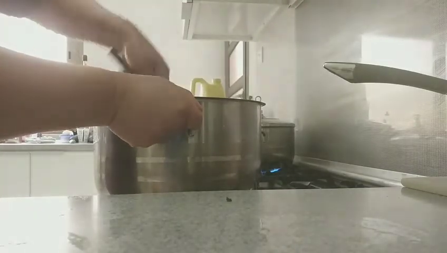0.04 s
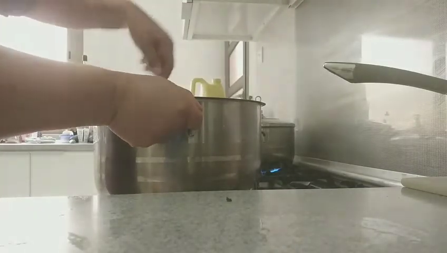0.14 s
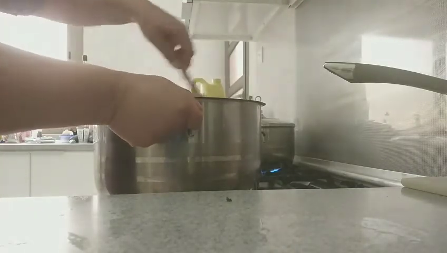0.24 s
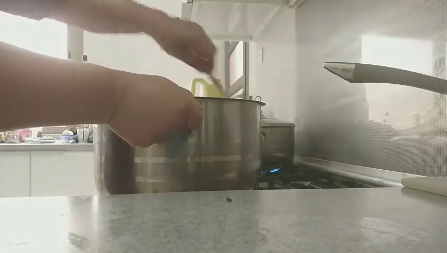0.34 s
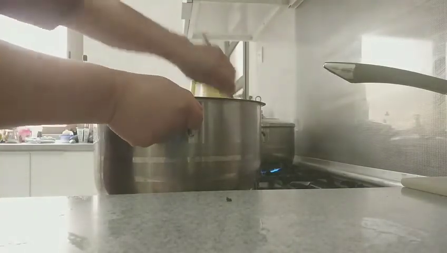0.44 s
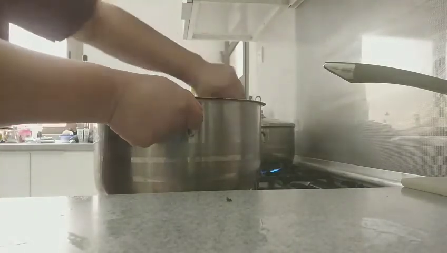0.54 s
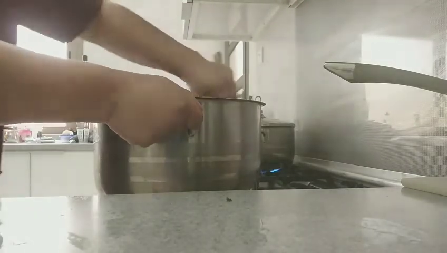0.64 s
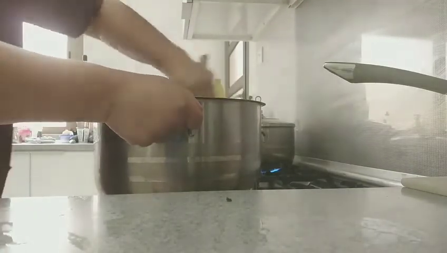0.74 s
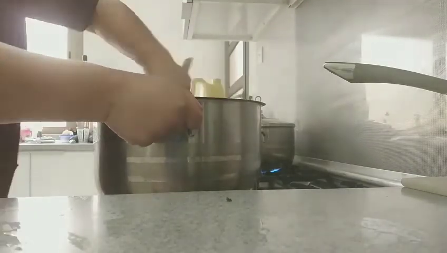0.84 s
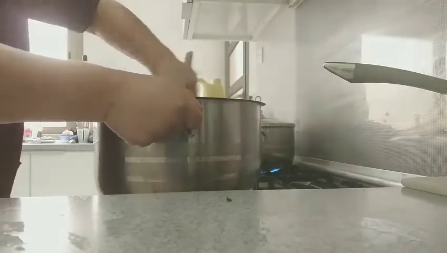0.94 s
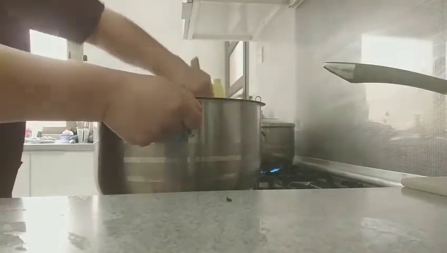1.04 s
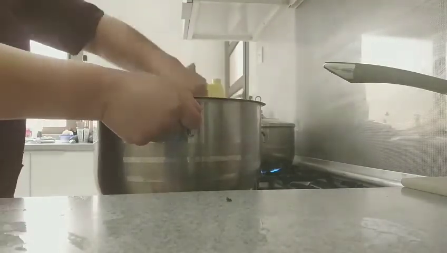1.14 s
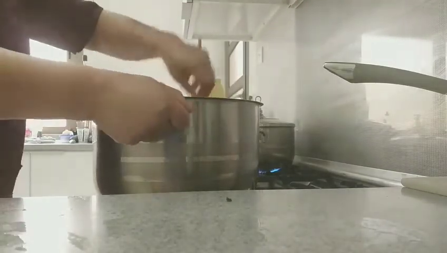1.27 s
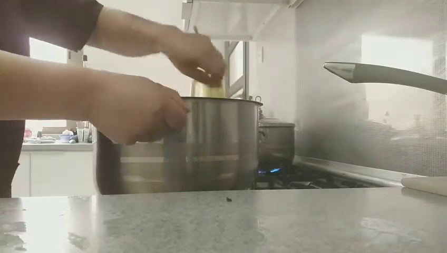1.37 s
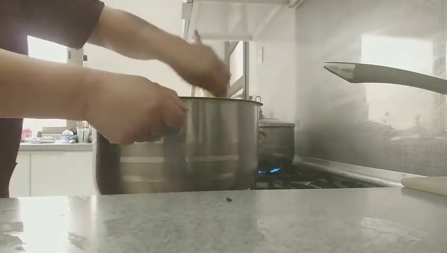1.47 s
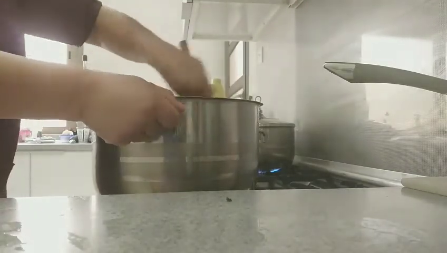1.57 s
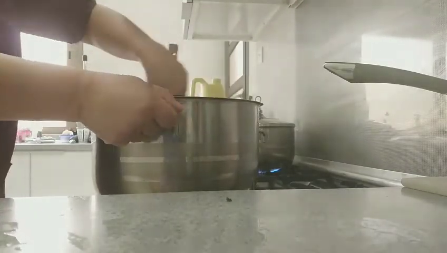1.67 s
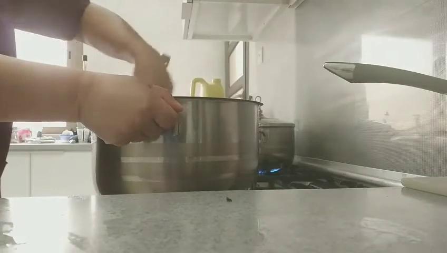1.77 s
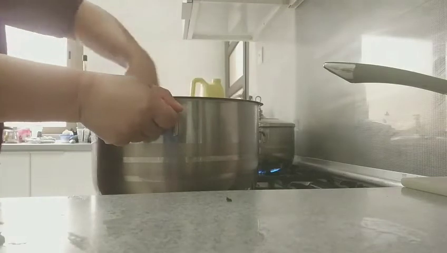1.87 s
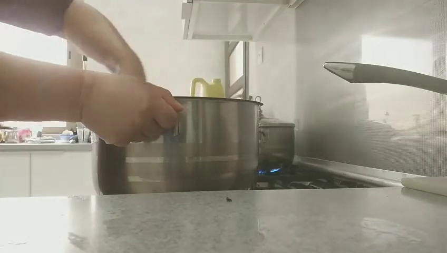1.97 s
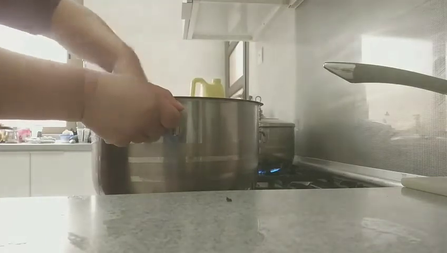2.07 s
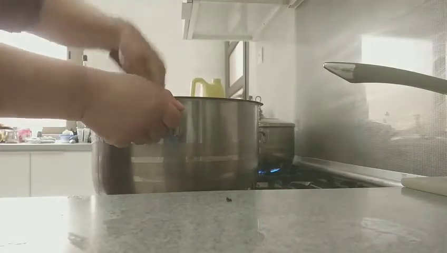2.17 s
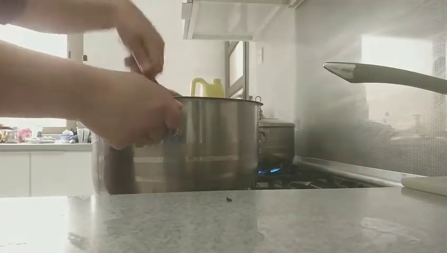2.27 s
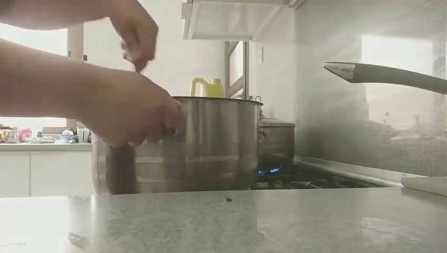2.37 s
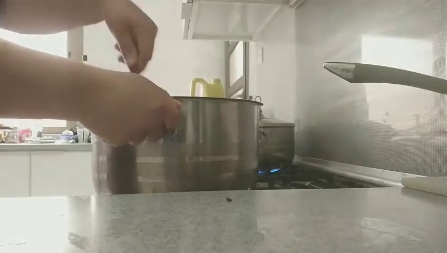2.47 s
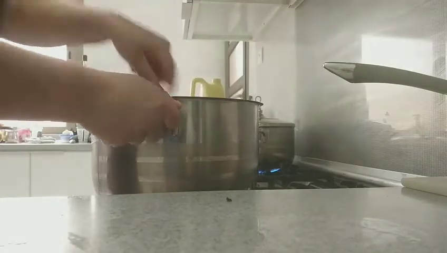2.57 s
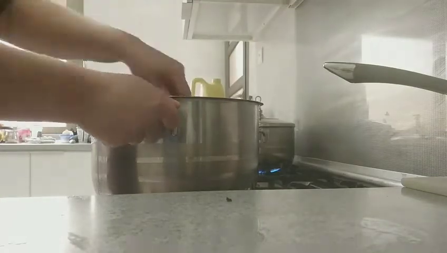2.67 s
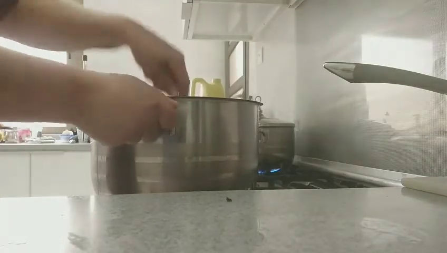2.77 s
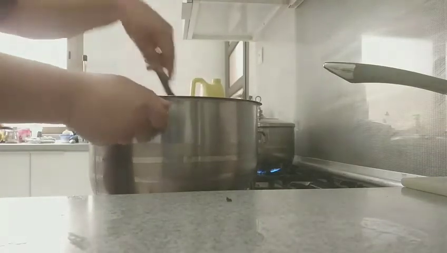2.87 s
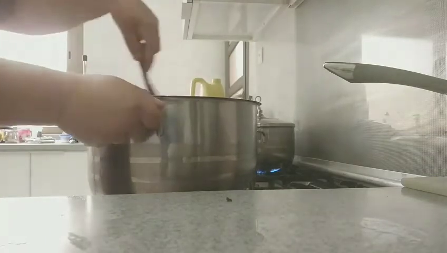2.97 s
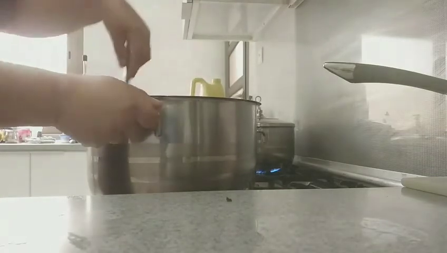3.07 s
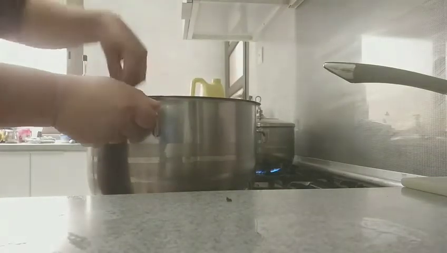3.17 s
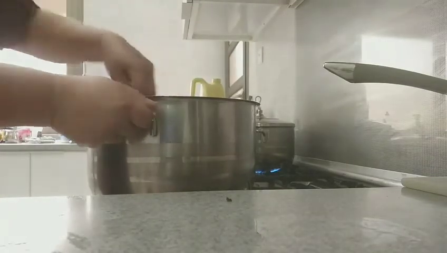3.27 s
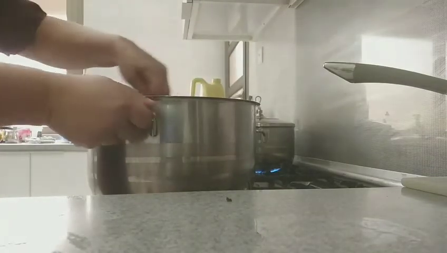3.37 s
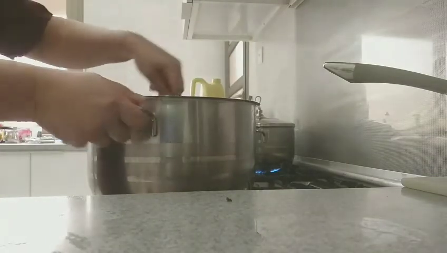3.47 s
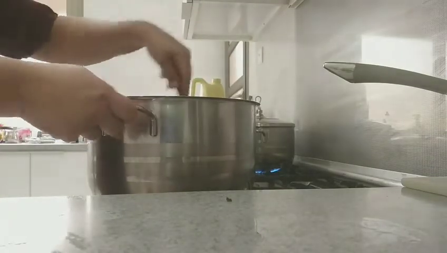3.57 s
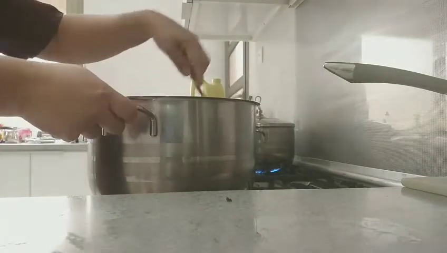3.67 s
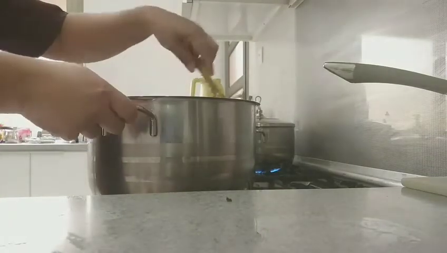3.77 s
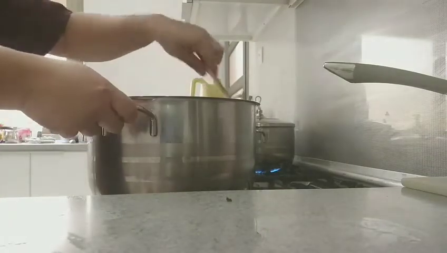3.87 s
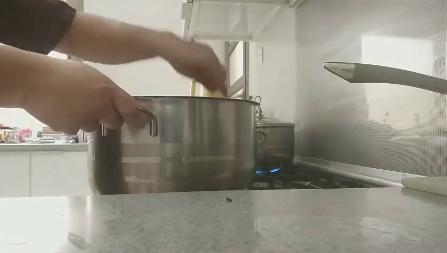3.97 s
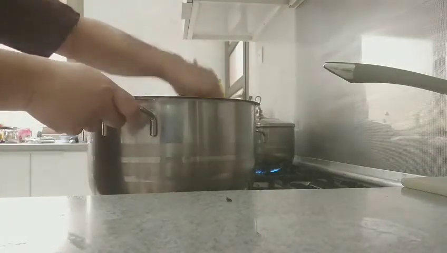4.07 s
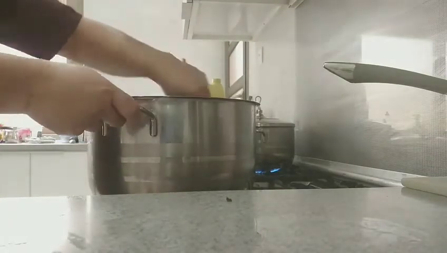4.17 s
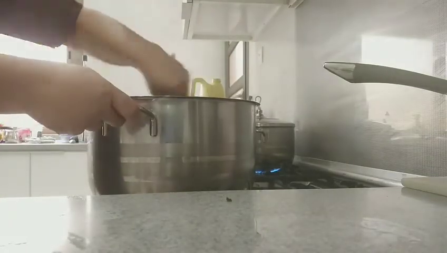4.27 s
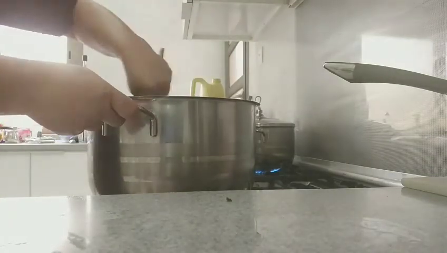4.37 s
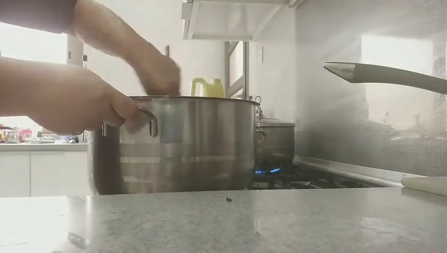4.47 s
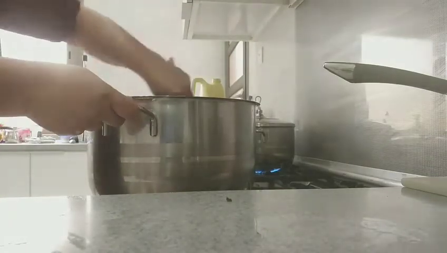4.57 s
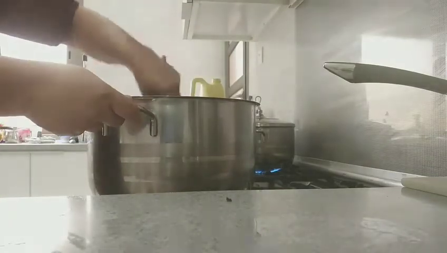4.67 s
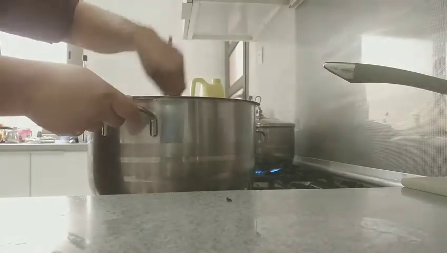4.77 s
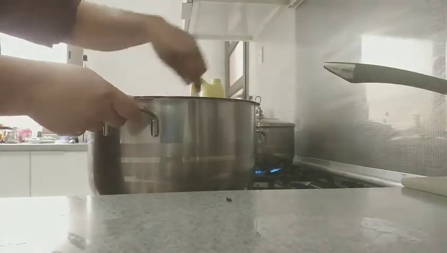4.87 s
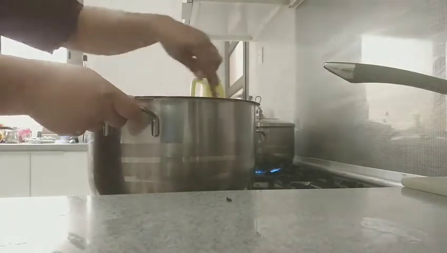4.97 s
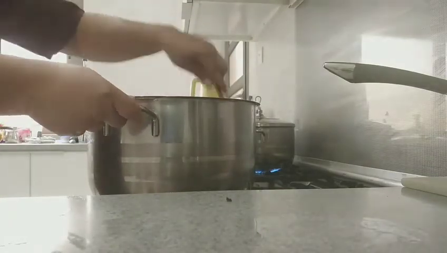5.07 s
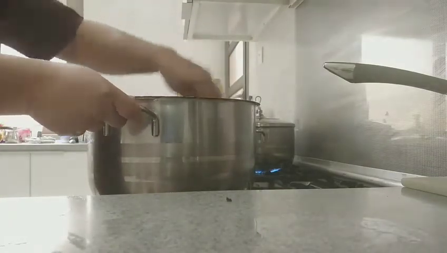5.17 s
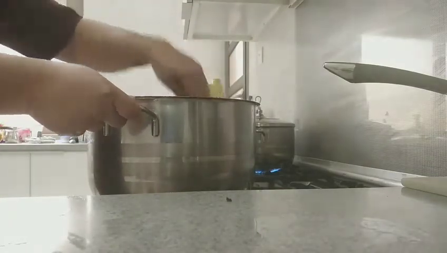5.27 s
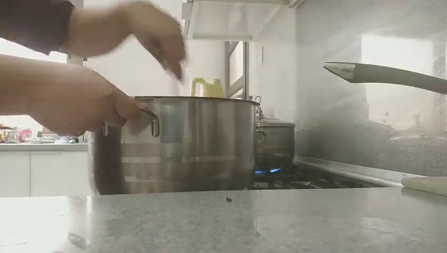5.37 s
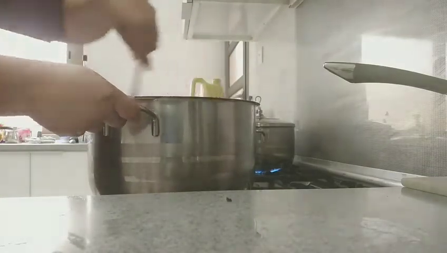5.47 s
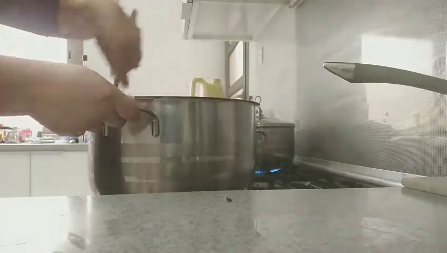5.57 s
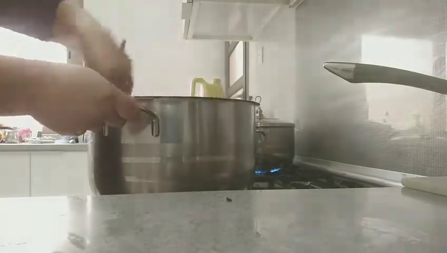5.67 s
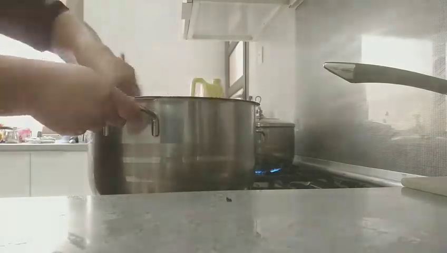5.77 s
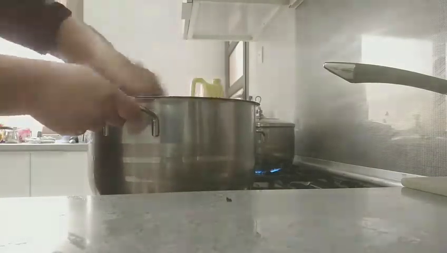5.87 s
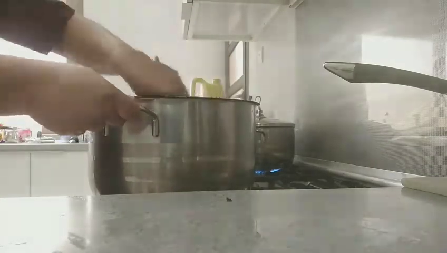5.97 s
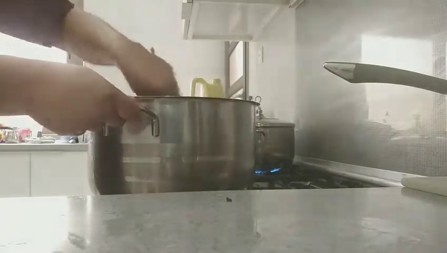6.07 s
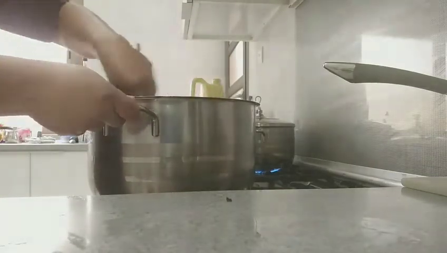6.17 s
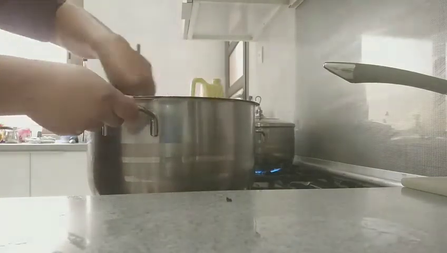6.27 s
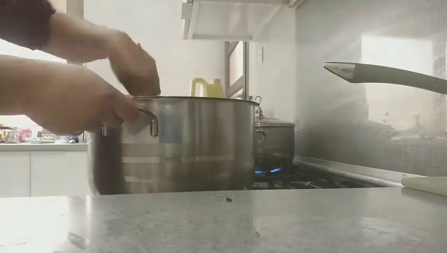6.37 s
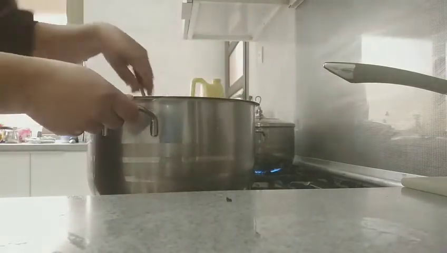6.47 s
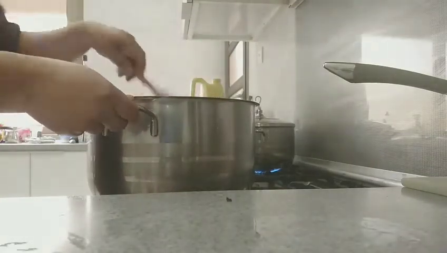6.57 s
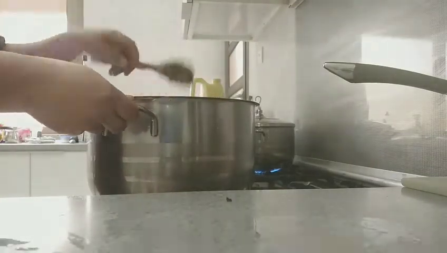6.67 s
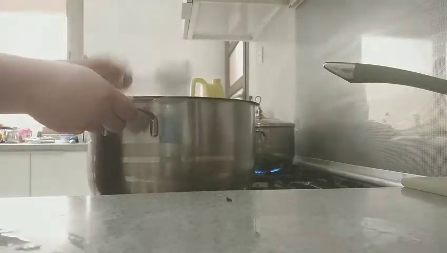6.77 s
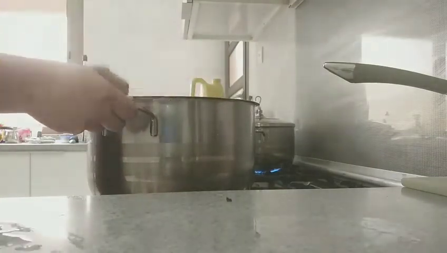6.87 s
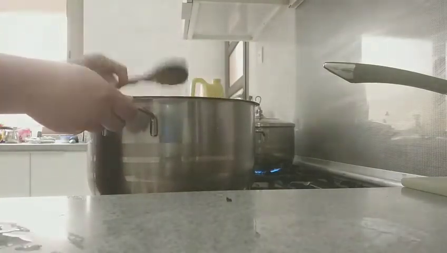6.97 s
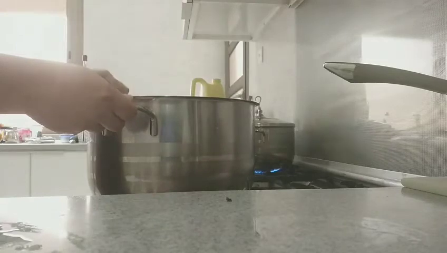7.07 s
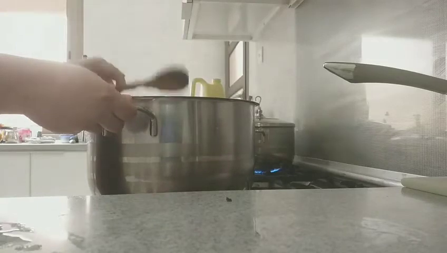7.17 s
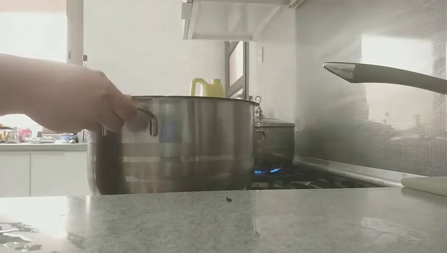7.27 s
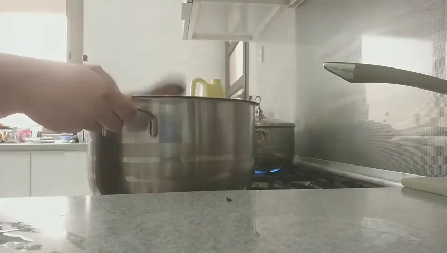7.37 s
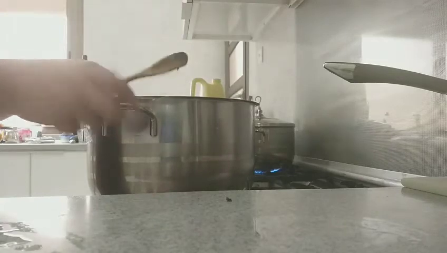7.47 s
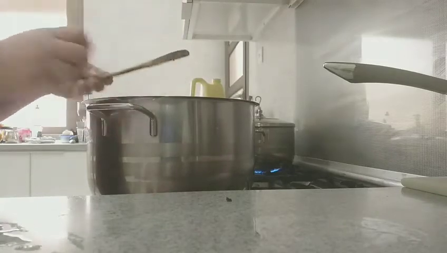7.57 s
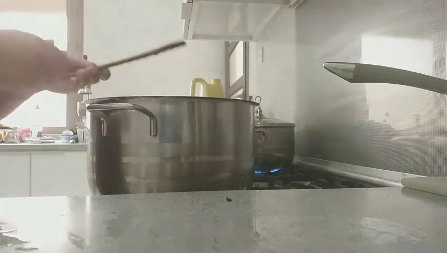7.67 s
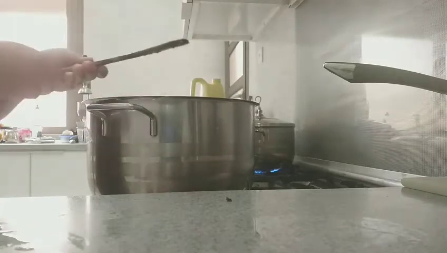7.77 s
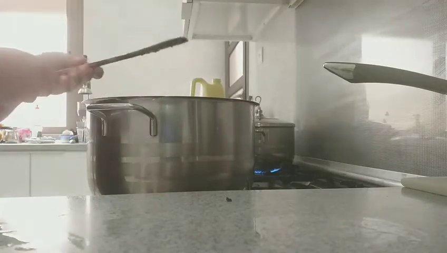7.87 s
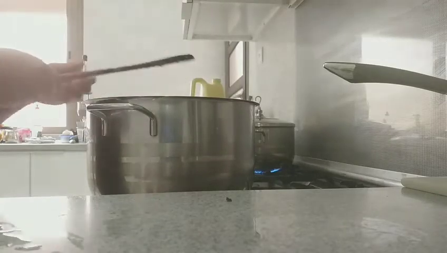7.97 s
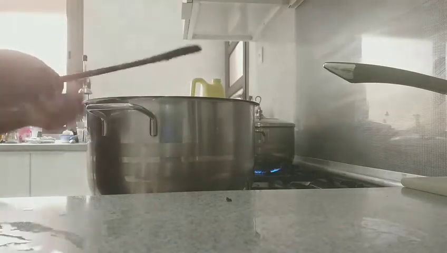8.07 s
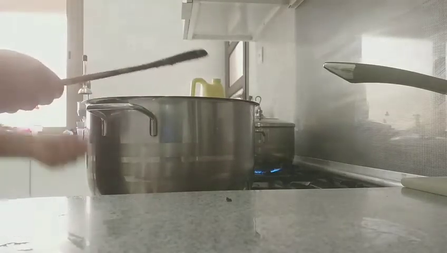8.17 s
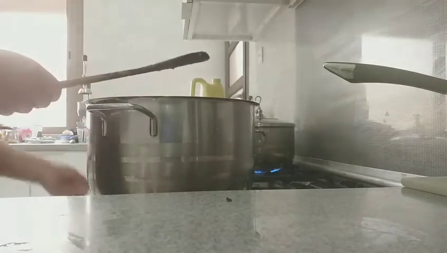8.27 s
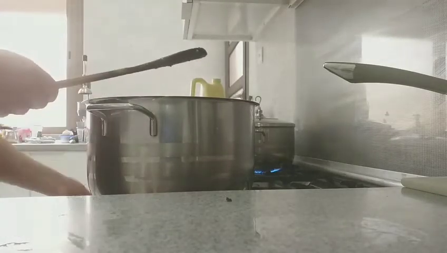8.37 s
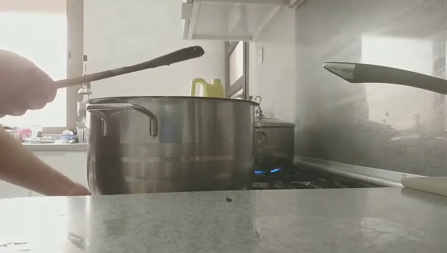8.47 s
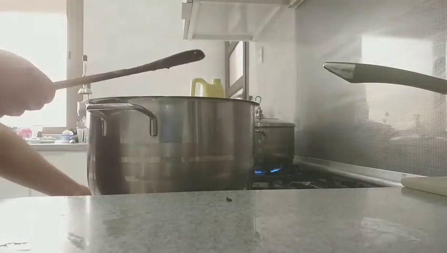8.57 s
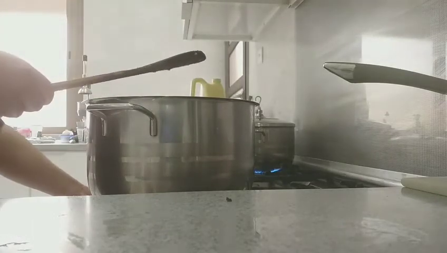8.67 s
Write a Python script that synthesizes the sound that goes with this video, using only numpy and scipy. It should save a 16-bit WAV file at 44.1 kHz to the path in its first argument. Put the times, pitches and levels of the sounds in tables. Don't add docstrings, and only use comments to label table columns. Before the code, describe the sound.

Stirring in a large steel pot: gritty scrapes, sizzling spits and scattered clanks, ending in three bright, ringing raps on the rim.

```python
import sys
import numpy as np
from scipy import signal
from scipy.fft import rfft, irfft
from scipy.io import wavfile
from scipy.ndimage import uniform_filter1d

SR = 44100
rng = np.random.default_rng(int(sys.argv[2]) if len(sys.argv) > 2 else 0)


def level_to_linear(level):
    exponent = np.asarray(level, float) / 20
    return 10 ** exponent


def pcm_store(signal):
    levels = np.round(np.clip(np.atleast_2d(signal), -1, 1) * 32767)
    wavfile.write(sys.argv[1], SR, levels.astype(np.int16).T)


N = 384552


def level(x, db):
    return x * level_to_linear(db) / np.sqrt(np.mean(x ** 2))


def band(x, lo_hz, hi_hz, order=3):
    return signal.sosfilt(signal.butter(order, [lo_hz, hi_hz], "band", fs=SR, output="sos"), x)


def walk(rate_hz):
    hold = int(SR / rate_hz)
    held = np.repeat(rng.standard_normal(N // hold + 1), hold)
    return 1.8 * uniform_filter1d(uniform_filter1d(held, hold), hold)[:N]


def fade(t, t60_s):
    return np.exp(-np.log(1000) * t / np.maximum(t60_s, 1 / 200))


def ring(modes, t, scatter_db, wobble):
    hz, db, t60_s = np.transpose(modes)[:, :, None]
    chance = rng.standard_normal((len(modes), 1))
    steps = rng.standard_normal((len(modes), len(t) // 64 + 1))
    path = np.repeat(np.cumsum(steps, axis=1), 64, axis=1)[:, :len(t)]
    drift = wobble * np.sqrt(hz / 1000) * path
    tones = np.sin(2 * np.pi * hz * t + drift)
    return np.sum(level_to_linear(db + scatter_db * chance) * fade(t, t60_s) * tones, axis=0)


# (peak t/s, level/dB, grit/dB, rise s per 10 dB, fall s per 10 dB)
SCRAPES = [(0.019, -59, 8, 0.2, 0.2), (0.301, -60.5, 0.5, 0.19, 0.073), (.7, -54, 4, 0.087, 0.11),
           (.93, -55, -4, 0.071, 0.17), (1.09, -51.5, -9, 0.14, 0.2), (1.41, -45, 4.7, 0.029, 0.15),
           (1.49, -43.5, 0.7, 0.13, 0.11), (1.72, -47, -4.5, 0.15, 0.18), (2.05, -57.5, 5.7, 0.42, 0.19),
           (2.78, -57.5, 7.5, 0.19, 0.087), (3.05, -46, 3, 0.081, 0.17), (3.42, -48.5, 3, .11, 0.11),
           (3.88, -60.5, 1, 0.046, 0.21), (4.22, -52.5, 7, 0.12, 0.14), (4.51, -52, -20, 0.12, 0.25),
           (4.7, -54, -7, 0.19, 0.23), (5.05, -67, 3, 0.17, 0.075), (5.4, -59, 1.5, 0.081, 0.17),
           (5.82, -53.5, 2, 0.052, 0.11), (6.03, -55, 4.3, .1, 0.34), (6.34, -52, -3.5, 0.15, 0.22),
           (6.49, -57, -9, 0.11, .15)]
# thrum, rub, rasp, sizzle [level/dB]
SCRAPE_COLOUR_DB = [-4.5, 0.5, -4.5, -8]
GRIT_SHARE = [0.41, 0, 0.81, .6]
# (peak t/s, level/dB, rise s per 10 dB)
SPITS = [(.05, -57, 3.5), (0.681, -61.5, 0.75), (1.01, -57.5, 0.1), (1.16, -57, 0.2), (1.45, -54.5, 0.25),
         (1.66, -52, -1.9), (1.78, -55, -1.5), (2.33, -54.5, 0.5), (2.63, -53, 0.08), (2.82, -56, -0.2),
         (3.06, -66, 0.6), (3.42, -58, -0.6), (3.61, -55.5, .04), (3.79, -53.5, 0.04), (4.23, -51, 0),
         (4.56, -53, 0.23), (4.75, -59, .1), (5.35, -61, 0.34), (5.87, -54, -0.13), (6.03, -58.5, 0.17),
         (6.4, -61, -0.2), (6.5, -65, -0.4)]
SPIT_COLOUR_DB = [-33, -8, -4, 0.5]
SIMMER_DB = [-70.5, -72.5, -68, -67.5]


def swell(t, peak_s, db, rise_s, fall_s):
    climb = (t - peak_s) / max(rise_s, .01)
    sink = (peak_s - t) / max(fall_s, .01)
    return level_to_linear(2 * db + 20 * np.minimum(climb, sink))


def effort_db(k):
    t = np.arange(0, N / SR, 1 / 500)
    lift_s, simmer_fade_db_s = 6.6, 3.1
    power = swell(t, 0, SIMMER_DB[k], 1, 10 / simmer_fade_db_s) * (t < lift_s)
    for s, db, grit_db, rise_s, fall_s in SCRAPES:
        stroke_db = db + SCRAPE_COLOUR_DB[k] + GRIT_SHARE[k] * grit_db
        power = power + swell(t, s, stroke_db, rise_s, fall_s)
    for s, db, rise_s in SPITS:
        power = power + swell(t, s, db + SPIT_COLOUR_DB[k], rise_s, fall_s=0.083)
    return np.interp(np.arange(N) / SR, t, 10 * np.log10(power + 1e-14))


# (f/Hz, level/dB, t60/s)
DRAG = [(266, -2.5, 0.13), (365.4, -7.5, 0.09), (592.5, -5.8, 0.11), (734.6, -1.5, 0.1), (993.6, -3.5, .15),
        (1207, -4.5, 0.063), (1734, -6, 0.19), (1920, 0.5, 0.043), (2685, -10, 0.15), (3010, -9.5, 0.14),
        (3572, -9.5, 0.053), (4820, -9, 0.081), (6120, 1.5, 0.072), (6800, -6, 0.074), (7960, -8, 0.042),
        (8900, -5, 0.074)]
# (from f/Hz, to f/Hz)
STIR_BANDS = [(330, 850), (900, 2300), (2300, 5800), (5000, 10300)]
BODY_DB = [-1.5, -5, -9, -18]


def stir():
    slip_size = level_to_linear(1.7 * rng.exponential(size=N))
    slips = rng.standard_normal(N) * slip_size * (rng.random(N) < .2)
    response = ring(DRAG, np.arange(SR // 4) / SR, scatter_db=0, wobble=0)
    body = signal.fftconvolve(slips, response)[:N]
    out, drag = 0, walk(16)
    for k, ((lo, hi), body_db) in enumerate(zip(STIR_BANDS, BODY_DB)):
        rasp = level(band(slips, lo, hi, order=2), 0)
        part = rasp + level(band(body, lo, hi), body_db)
        out = out + level(part, -0.78) * level_to_linear(effort_db(k) + 0.44 * drag + walk(25))
    return out


# (from f/Hz, to f/Hz)
HIT_BANDS = [(800, 1400), (140, 750), (1400, 2200), (2300, 3600), (4000, 9000)]


def blow(t, band_db, modes, wash, scatter_db):
    head = slice(0, SR // 50)
    clear = ring(modes, t, scatter_db, wobble=0.15)
    dense, hit = rng.standard_normal(len(t)), 0
    for (lo, hi), db, row in zip(HIT_BANDS, band_db, wash):
        from_hz, to_hz, early_s, late_s, late_db, wash_db = row
        decay = fade(t, early_s) + level_to_linear(late_db) * fade(t, late_s)
        tail = band(dense * decay, from_hz, to_hz)
        part = band(clear, lo, hi)
        part = part / np.std(part[head]) + level_to_linear(wash_db) * tail / np.std(tail[head])
        hit = hit + level_to_linear(db - 5.0) * part / np.std(part[head])
    return hit, dense


def blows(events, modes, wash, scatter_db, rise_s, crack, fizz_db, edge_db, thump_db):
    out, t = np.zeros(2 * N), np.arange(int(SR * 6 / 5)) / SR
    hardest_db = np.max(np.array(events)[:, -1])
    for s, *band_db in events:
        thud_db, tick_db = band_db[1], band_db[-1]
        hit, dense = blow(t, band_db, modes, wash, scatter_db)
        fizz = band(dense, 7140, 10000) * (fade(t, .06) + 0.29 * fade(t, 0.68))
        hit = hit + level_to_linear(tick_db + fizz_db) * fizz
        edge = band(dense, 9000, 21000) * (fade(t, 0.062) + 0.4 * fade(t, 0.7))
        hit = hit + level_to_linear(2 * tick_db - hardest_db + edge_db) * edge
        hit = hit + level_to_linear(thud_db + thump_db) * band(dense * fade(t, 0.85), 70, 160)
        onset = 1 - np.exp(-t / max(rise_s, 1 / SR))
        start = int(s * SR)
        out[start:start + len(t)] += hit * onset * (1 + crack * fade(t, 0.031))
    return out[:N]


# (t/s, level/dB, hardness/dB, rebound lag/s, rebound level/dB)
RAPS = [
    (6.998, -11.5, 2, 0.063, -23),
    (7.22, -10.5, 0.86, 0.063, -24),
    (7.455, -10, -4.5, .075, -25.5),
]
# clang, thud, ring, clink, tick of a rap [level/dB]
RAP_COLOUR_DB = [-2.5, -10, -0.53, -9.5, -5]
REBOUND_COLOUR_DB = [-4, -1.6, -3.2, -23, -6.5]
HARD_SHARE = [0.15, -0.41, -0.19, .6, 1.12]
# (f/Hz, level/dB, t60/s)
RIM = [(196, -8.5, 0.42), (296, -11, 0.41), (352, -10, 0.56), (444, -13, 0.5), (979, -4, 0.47),
       (1050, -7, 0.8), (1195, -8, 0.6), (1270, 4, 0.2), (1373, -7, 0.9), (1512, -3, 0.7), (1420, -10, .9),
       (1624, 2, 0.2), (1640, -11, 0.9), (1694, -5, 1.0), (2094, -16, .4), (2460, -12, .4),
       (2678, -5, 0.55), (2930, -12, 0.6), (3510, -18, 0.9), (4716, -18, 0.55), (4867, -12, 0.3),
       (5500, -17, 0.8), (5889, -14, 0.6), (6228, -15, 0.6), (6400, -5.5, 0.13), (7773, -1, 0.05)]
# (from f/Hz, to f/Hz, early t60/s, late t60/s, late share/dB, level re clear modes/dB)
RAP_WASH = [(877, 1346, .1, 0.97, -6, -1.5), (136, 500, 0.34, 1.2, -2, -1), (1341, 1900, .06, 1.06, -7, 0),
            (2420, 3500, 0.051, 1, -5.5, 2), (4520, 6400, 0.045, 0.99, -11.5, 4)]


def rim_raps():
    rows = []
    for s, db, hard_db, lag_s, rebound_db in RAPS:
        lift_db = hard_db * np.array(HARD_SHARE)
        rows.append((s, *(db + lift_db + RAP_COLOUR_DB)))
        rows.append((s + lag_s, *(rebound_db + lift_db + REBOUND_COLOUR_DB)))
    return blows(rows, RIM, RAP_WASH, scatter_db=1.5, rise_s=0.0021, crack=1.1,
                 fizz_db=1.9, edge_db=-7, thump_db=5.5)


# (t/s, clang level/dB, thud re clang/dB, handle clink level/dB, tick re clink/dB)
KNOCKS = [(0.585, -31.5, -4.5, -48.5, -2.5), (0.996, -50.5, -9, -41, 2), (1.047, -48.5, -18, -39.5, -5),
          (1.248, -59, -17, -52.5, 0.5), (1.629, -36, -5.5, -34, -4.5), (1.938, -55.5, 10, -65, 12),
          (2.632, -40, -4.5, -53, 4), (2.819, -53, -19, -54, -1.5), (3.777, -63, -14, -45, 7.5),
          (3.811, -58, -15, -54, -14.5), (4.080, -29, -5, -64.5, 0), (4.559, -56, -17, -45, 3),
          (5.223, -32.5, -0.3, -47, -16.5), (5.599, -71, 6, -65, 3.5), (5.747, -28.5, -14.5, -33.5, -10),
          (5.896, -35, 2.1, -62, 7), (6.399, -48, 3, -68.5, 9.5)]
# (f/Hz, level/dB, t60/s)
WALL = [(157, -13, 0.49), (312, -25.5, 0.21), (448, -11, 0.64), (497, -4.5, 0.41), (614, -8.5, 0.2),
        (936, 1, 0.51), (986, 5.5, 0.42), (1057, -8.5, 0.99), (1185, -8.5, 0.4), (1272, -7.5, 0.35),
        (1762, -6, 0.3), (1934, -0.5, 0.18), (2050, -7, .4), (2134, -6, 0.31), (2540, -14.5, 0.19),
        (2710, -6, 0.49), (2880, -12, 0.09), (3030, -6.5, 0.21), (3490, -24.5, 0.89), (4390, -4, 0.2),
        (4750, -5, 0.44), (5000, -11, 0.51), (5060, -16, 0.84), (5800, -18, 0.54), (5750, -27, 0.45),
        (5950, -10.5, 0.78), (6630, -11.5, 0.091), (7000, -22, .26)]
# (from f/Hz, to f/Hz, early t60/s, late t60/s, late share/dB, level re clear modes/dB)
KNOCK_WASH = [(880, 1200, 0.1, 0.51, 4, -12), (140, 680, 0.088, 0.98, 2.8, -3),
              (1630, 2300, 0.1, 0.98, -8, -0.5), (2450, 3600, 0.044, 0.92, 1, -3),
              (4000, 6600, 0.16, 1, -1, 7)]


def wall_knocks():
    rows, wall_share = [], 0.65
    for s, wall_db, thud_db, clink_db, tick_db in KNOCKS:
        ring_db = wall_share * wall_db + (1 - wall_share) * clink_db - 3.5
        rows.append((s, wall_db, wall_db + thud_db, ring_db, clink_db, clink_db + tick_db))
    return blows(rows, WALL, KNOCK_WASH, scatter_db=5.5, rise_s=0.0016, crack=0.37,
                 fizz_db=-4.5, edge_db=-17, thump_db=-4.5)


# (f/Hz, level per Hz/dB)
KITCHEN = [(30, -31.5), (70, -25), (110, -14), (300, -17.5), (600, -20.5), (1100, -26), (2000, -39.5),
           (2500, -36.5), (6200, -31), (7300, -24.5), (9300, -25), (12000, -34.5), (14200, -33.5),
           (15200, -20.5)]


def flame_and_rumble():
    out, surge = 0, walk(0.91)
    hz, db = np.transpose(KITCHEN)
    for mid_hz in 30 * 2 ** (np.arange(37) / 4):
        band_db = np.interp(np.log(mid_hz), np.log(hz), db) + 10 * np.log10(mid_hz)
        noise = band(rng.standard_normal(N), mid_hz / 2 ** (1 / 8), mid_hz * 2 ** (1 / 8), order=2)
        out = out + level(noise, band_db) * level_to_linear(.4 * surge + .6 * walk(3.8))
    return level(out, -62.5)


# (f/Hz, width/Hz, level/dB)
HUM = [(97, 12, -67.5), (159.3, 31, -64), (205, 18, -73), (920, 150, -68), (1724, 67, -71.5),
       (1907, 140, -67.5)]
# (f/Hz, level/dB)
WHINE = [(12172, -80)]


def appliances():
    out = 0
    for hz, width_hz, db in HUM:
        noise = band(rng.standard_normal(N), hz - width_hz / 2, hz + width_hz / 2, order=1)
        out = out + level(noise, db) * level_to_linear(1.6 * walk(2.927))
    for hz, db in WHINE:
        phase = 2 * np.pi * hz * np.arange(N) / SR + .4 * walk(30)
        out = out + np.sqrt(2) * level_to_linear(db + 10.0) * np.sin(phase)
    return out


# (f/Hz, width/Hz, level/dB)
PORTS = [(1700, 690, -13), (9450, 1800, -15.5), (13000, 4000, -25.5)]


def scene():
    mid = stir() + rim_raps() + wall_knocks() + flame_and_rumble() + appliances()
    side = 0
    for (hz, width_hz, db), lag_samples in zip(PORTS, (1, 2, 1)):
        late = np.roll(mid, lag_samples)
        side = side + level_to_linear(db) * band(late, hz - width_hz / 2, hz + width_hz / 2, order=2)
    return np.array([mid + side, mid - side])


def smooth(x, time_s):
    keep = np.exp(-1 / (time_s * SR))
    return signal.lfilter([1 - keep], [1, -keep], x)


def top_cut(x):
    return signal.sosfilt(signal.butter(12, 16780, fs=SR, output="sos"), x)


def record(dry):
    loud_db = 10 * np.log10(smooth(np.mean(dry ** 2, axis=0), 0.25) + 1e-12)
    over_db = np.clip(loud_db + 38.5, 0, 30)
    dip_db = smooth(0.47 * over_db, 0.6)
    lowpass = signal.ellip(8, .2, 60, 15500, fs=SR, output="sos")
    x = signal.sosfilt(lowpass, dry * level_to_linear(-dip_db))
    above_hz = np.fft.rfftfreq(N, 1 / SR) - 9600
    mix = irfft(rfft(x) * level_to_linear(-11 / (1 + np.exp(-above_hz / 150))), N)
    return top_cut(mix)


dry = scene()
out = record(dry)
pcm_store(out)
```